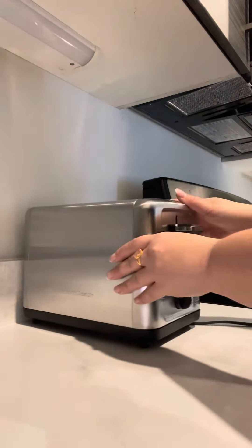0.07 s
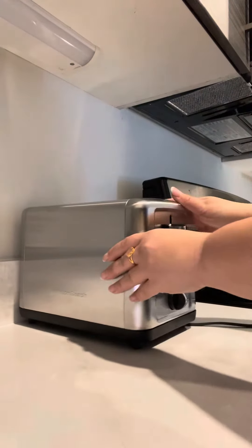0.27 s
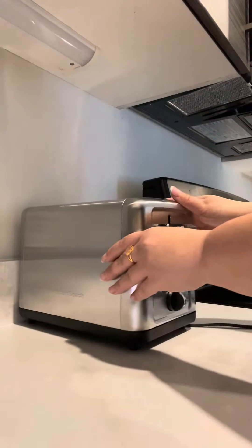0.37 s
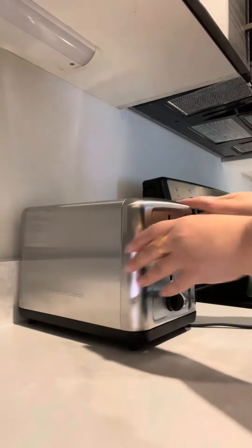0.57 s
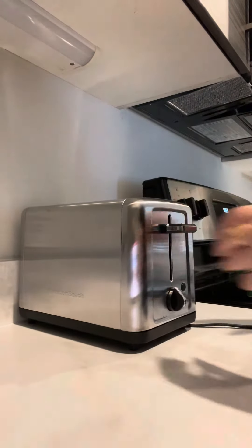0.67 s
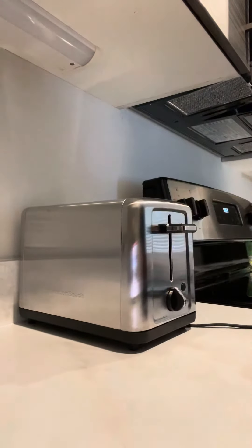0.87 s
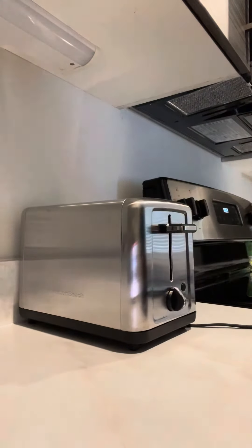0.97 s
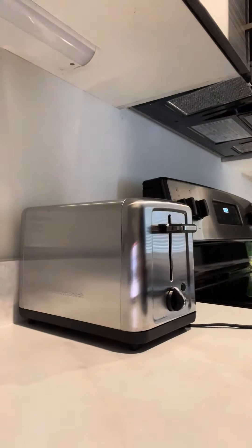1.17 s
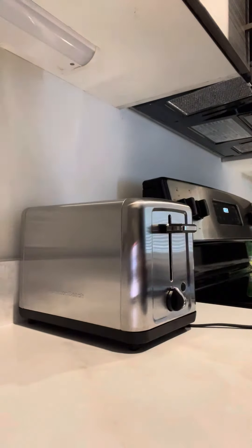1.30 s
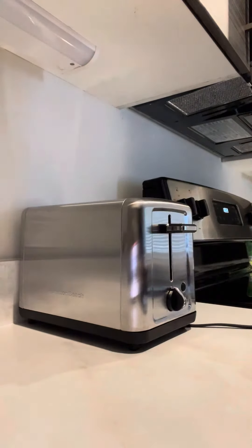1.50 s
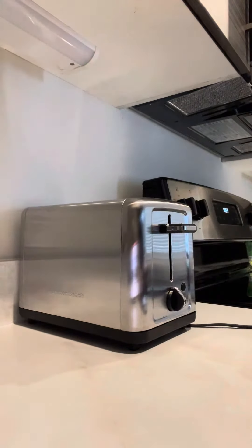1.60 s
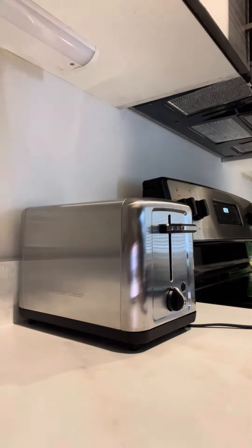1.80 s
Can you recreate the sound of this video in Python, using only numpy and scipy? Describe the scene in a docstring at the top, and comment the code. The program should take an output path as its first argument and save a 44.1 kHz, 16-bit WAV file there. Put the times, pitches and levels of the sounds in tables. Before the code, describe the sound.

A metal toaster slams on a stone counter, heard close in a quiet kitchen. Dull knocks and soft rubbing open at 0-0.05 s; a metallic clack and low thump follow near 0.21 s. At 0.39 s comes the loud double slam, chattering until 0.65 s, with sizzling wires, clinks to 0.83 s and fading steel ring. A faint knock and sharp tick come around 1.65 s, over low hum.

```python
"""Toaster dropped on a counter

A steel toaster is tipped by hand and dropped on a stone kitchen counter, close to a phone: knocks, clacks, a slam.
The slam is noise bursts plus decaying shell and rack modes; dense panel ringing is rippled noise.
Loose wires and springs sizzle as random grains and clink as short noise with chance wire notes.
Small sharp ticks follow (impulse, noise tail, low modes), over room noise, a low hum and a faint hiss."""
import sys
import numpy as np
from scipy import signal
from scipy.fft import rfft, irfft
from scipy.io import wavfile
from scipy.ndimage import uniform_filter1d

SR = 44100
rng = np.random.default_rng(int(sys.argv[2]) if len(sys.argv) > 2 else 0)


def store_pcm(level_fs):
    """Save levels as 16-bit WAV."""
    pcm = np.round(np.clip(level_fs, -1, 1) * 32767).astype(np.int16)
    wavfile.write(sys.argv[1], SR, np.atleast_2d(pcm).T)


N = 81585
TIME_S = np.arange(N) / SR
FREQS_HZ = np.fft.rfftfreq(N, 1 / SR)
MIC_GAP_M, SOUND_M_S = 0.17, 343
# largest phase difference of a mode between the two microphones
SHELL_PHASE_RAD, PART_PHASE_RAD = 1.07, 0.41


def undb(db):
    """Decibels to gain."""
    return 10 ** (np.asarray(db) / 20)


def over_hz(table, hz):
    """Interpolate (frequency, value) points on a log frequency axis."""
    f, v = np.array(table).T
    return np.interp(np.log(np.maximum(hz, 1)), np.log(f), v)


def level_curve(table):
    """Gain over time from (time, level) points."""
    return undb(np.interp(TIME_S, *np.array(table).T))


# left-right correlation, treble centred near 7.5 kHz and wider around it:
# (frequency [Hz], correlation [-1 to 1])
CORRELATION_HZ = [(500, 0.3), (720, -0.066), (2800, 0.28), (4300, -0.42), (7500, 1), (11000, -0.49)]


def colour(pair, spectrum):
    """Shape a mid/side pair to a spectrum and a left-right correlation, high for long waves; rms 1."""
    diffuse = np.sinc(2 * FREQS_HZ * MIC_GAP_M / SOUND_M_S)
    listed = np.clip(over_hz(CORRELATION_HZ, FREQS_HZ), -1, 1)
    correlation = np.where(FREQS_HZ < SOUND_M_S / (4 * MIC_GAP_M), diffuse, listed)
    shape = undb(over_hz(spectrum, FREQS_HZ))
    mid, side = rfft(pair) * shape * np.sqrt([1 + correlation, 1 - correlation])
    stereo = irfft(np.array([mid + side, mid - side]), N)
    return stereo / np.sqrt(np.mean(stereo ** 2))


def noise(spectrum):
    """Coloured stereo noise, rms 1."""
    return colour(rng.standard_normal((2, N)), spectrum)


def grains(spectrum, per_s, spread_db):
    """A swarm of tiny contacts of uneven size, rms 1."""
    hit = rng.random(N) < per_s / SR
    size = undb(spread_db * np.minimum(rng.exponential(size=N), 5))
    return colour(hit * size * rng.standard_normal((2, N)), spectrum)


def decay(start_s, t60_s, attack_s=0.0011):
    """Quick rise, exponential fall."""
    age_s = np.maximum(TIME_S - start_s, 0)
    rise = 1 - np.exp(-age_s / attack_s)
    return rise * np.exp(-np.log(1000) * age_s / t60_s)


def modes(start_s, table, phase_rad=PART_PHASE_RAD):
    """Struck modes, out of step between the sides by chance, as far as the microphone gap allows."""
    out, sides = 0, np.array([[0.5], [-0.5]])
    leads = rng.choice([-1, 1], len(table))
    for (hz, db, t60_s), lead in zip(table, leads):
        phase = lead * min(phase_rad, 2 * np.pi * hz * MIC_GAP_M / SOUND_M_S)
        wave = np.sin(2 * np.pi * hz * (TIME_S - start_s) + sides * phase)
        out = out + undb(db) * decay(start_s, t60_s) * wave
    return out


def wander(span):
    """A smooth random curve of standard deviation 1 that changes over about span points."""
    width = max(int(span), 2)
    curve = uniform_filter1d(uniform_filter1d(rng.standard_normal(N), width), width)
    return curve / curve.std()


# base lands edge after edge, then chatters: (time [s], level [dB])
LANDINGS_S_DB = [(0.3885, -15), (0.3956, -13.5), (0.422, -28), (0.464, -29), (0.4825, -21), (0.503, -24),
                 (0.5185, -29), (0.6497, -40)]
# colour of a landing: (frequency [Hz], relative density [dB per Hz])
SLAM_HZ_DB = [(45, -25), (80, -36), (170, -16), (250, -20), (330, -7), (420, -6), (900, 3.5), (1350, 2.5),
              (1900, -15), (3500, -27), (7000, -20.5), (12000, -36)]
# clear shell modes: (frequency [Hz], level [dB], t60 [s])
SHELL_HZ_DB_S = [(94.65, -32, 1.02), (152.3, -27, 0.32), (180.3, -21.5, 0.26), (216, -25, 0.27),
                 (322.5, -28, 1.23), (343.6, -14.5, 0.14), (486.3, -24, 1.03), (540.5, -29.5, 1.15),
                 (600.5, -36, 1), (624, -15.5, 0.11), (678, -25, 0.064), (812, -20.5, 0.43),
                 (854, -17, 0.27), (926, -33.5, 1.58), (991, -31.5, 1.59), (1095, -21.5, 0.43),
                 (1213, -25.5, 0.37), (1246, -33, 0.11)]
# long notes of the wire racks: (frequency [Hz], level [dB], t60 [s])
RACKS_HZ_DB_S = [(1365, -34.5, 1.6), (1520, -39.5, 1.2), (1717, -37, 0.91), (2137, -46, 0.92),
                 (2580, -56, 0.52), (2920, -39, 1.6), (2990, -47, 0.87), (4000, -34.5, 0.45)]
SLAM_T60_S, SLAM_ATTACK_S = 0.096, 0.00047


def slam():
    """The base hits the counter; the first landing sets shell and racks ringing."""
    blows = 0
    for s, db in LANDINGS_S_DB:
        blows = blows + undb(db) * decay(s, SLAM_T60_S, SLAM_ATTACK_S) * noise(SLAM_HZ_DB)
    return blows + modes(LANDINGS_S_DB[0][0], SHELL_HZ_DB_S + RACKS_HZ_DB_S, SHELL_PHASE_RAD)


# dense ringing of panels and wire racks: (frequency [Hz], relative density [dB per Hz])
RING_HZ_DB = [(30, -17), (80, -4), (130, -3), (230, -14.5), (300, 4.5), (400, -4), (520, 2.5), (650, -3),
              (950, 1), (1450, -3.5), (2050, -11), (2500, -12), (2900, -7), (3700, -14.5), (5000, -19.5),
              (11000, -41.5), (12300, -72)]
# its decay: (frequency [Hz], t60 [s])
RING_HZ_T60_S = [(80, 1.04), (300, 1.23), (1000, 1.616), (3000, 1.744), (9000, 1.44)]
RING_DB, RING_ATTACK_S = -18, 0.0065
RIPPLE_DB, RIPPLE_WIDTH_HZ = 2, 9.9
FLUTTER_DB, FLUTTER_S = 0.9, 0.012


def panel_ring():
    """Dense ringing of thin steel as unevenly rippled noise; each range flutters and decays at its own pace."""
    ripple = undb(RIPPLE_DB * wander(RIPPLE_WIDTH_HZ * N / SR)[:len(FREQS_HZ)])
    field = rfft(noise(RING_HZ_DB)) * ripple / np.sqrt(np.mean(ripple ** 2))
    out = 0
    for hz, t60_s in RING_HZ_T60_S:
        # crossfaded bands that sum to 1
        share = over_hz([(f, float(f == hz)) for f, _ in RING_HZ_T60_S], FREQS_HZ)
        flutter = undb(FLUTTER_DB * wander(FLUTTER_S * SR))
        fade = decay(LANDINGS_S_DB[0][0], t60_s, RING_ATTACK_S)
        out = out + irfft(field * share, N) * flutter * fade
    return undb(RING_DB) * out


CLINK_LOW_HZ, CLINK_HIGH_HZ = 1304, 9550
CLINK_RING_DB, CLINK_RING_T60_S = -8, 0.66


def wire_notes(start_s, count):
    """A chance handful of thin wire notes, different at every call; nominal rms 1 at the start."""
    hz = CLINK_LOW_HZ * (CLINK_HIGH_HZ / CLINK_LOW_HZ) ** rng.random(count)
    db = over_hz(SIZZLE_HZ_DB, hz)
    notes = [(f, d, CLINK_RING_T60_S) for f, d in zip(hz, db)]
    return modes(start_s, notes, SHELL_PHASE_RAD) / np.sqrt(np.sum(undb(db) ** 2) / 2)


# loose racks and springs clink against the shell: (time [s], level [dB])
CLINKS_S_DB = [(0.3985, -26), (0.411, -28), (0.5205, -25), (0.6501, -29), (0.773, -30.5), (0.826, -36.5)]
CLINK_T60_S = 0.076


def clinks():
    """Each clink is a short noise crack, coloured like the sizzle, with its own ringing wire notes."""
    out = 0
    for s, db in CLINKS_S_DB:
        crack = decay(s, CLINK_T60_S) * noise(SIZZLE_HZ_DB)
        out = out + undb(db) * (crack + undb(CLINK_RING_DB) * wire_notes(s, count=14))
    return out


# sizzling treble: (time [s], level [dB])
SIZZLE_S_DB = [(.386, -72), (.392, -24), (.43, -25.5), (.5, -34.5), (.6, -38), (.66, -31.5), (.77, -36),
               (.9, -41.5), (1.1, -58.5), (1.4, -99)]
# its colour, shared by clinks and hiss: (frequency [Hz], relative density [dB per Hz])
SIZZLE_HZ_DB = [(800, -4), (2200, 0), (3000, 7), (4300, -1), (4900, -3), (5800, -2), (7000, -7.5),
                (8500, -12.5), (10800, -9.5), (12000, -27)]


def sizzle():
    """Loose wires and springs chatter inside the shaken body."""
    return level_curve(SIZZLE_S_DB) * grains(SIZZLE_HZ_DB, per_s=4000, spread_db=-1.5)


# loose metal part clacks as the body tilts: (time [s], level [dB])
CLACKS_S_DB = [(0.2129, -25), (0.2189, -29.5)]
# its modes: (frequency [Hz], relative level [dB], t60 [s])
CLACK_HZ_DB_S = [(406, -8, 0.41), (555, -12, 0.2), (2224, -4, 0.15), (2450, -2, 0.13), (2570, -5, 0.093),
                 (2784, -7.5, 0.1), (3170, -9, 0.027)]
# its noise colour: (frequency [Hz], relative density [dB per Hz])
CLACK_NOISE_HZ_DB = [(120, -34), (200, -14.5), (1200, -9), (1700, -21.5), (2600, -10), (3940, -25),
                     (12000, -47.5)]
CLACK_NOISE_DB, CLACK_T60_S = -2.5, 0.12
THUMP_S, THUMP_HZ, THUMP_DB, THUMP_T60_S, THUMP_ATTACK_S = 0.223, 104.6, -18.5, 0.18, 0.0098


def tilt():
    """A metal part clacks over (modes, noise); the weight thumps on a rubber foot (decaying sine)."""
    clacks = 0
    for s, db in CLACKS_S_DB:
        rattle = undb(CLACK_NOISE_DB) * decay(s, CLACK_T60_S) * noise(CLACK_NOISE_HZ_DB)
        clacks = clacks + undb(db) * (modes(s, CLACK_HZ_DB_S) + rattle)
    wave = np.sin(2 * np.pi * THUMP_HZ * (TIME_S - THUMP_S))
    return clacks + undb(THUMP_DB) * decay(THUMP_S, THUMP_T60_S, THUMP_ATTACK_S) * wave


# dull knocks: (time [s], level [dB], pitch ratio, hollow-mode weight [dB])
KNOCKS_S_DB = [(.001, -33.5, 0.94, -5), (0.0122, -25, 1.02, 1.5), (0.0504, -28, 0.98, -16),
               (1.647, -36.5, 1.23, -1)]
# their noise colour: (frequency [Hz], relative density [dB per Hz])
KNOCK_HZ_DB = [(100, 17), (250, -27), (380, 3), (560, -22), (850, 10.5), (1300, -44), (2000, -3),
               (2750, -7), (4200, -21), (11000, -34)]
# their modes before the pitch ratio: (frequency [Hz], relative level [dB], t60 [s])
KNOCK_TAP_HZ_DB_S = [(863, -0.5, 0.04), (923, -5, 0.028)]
# their hollow low modes before ratio and weight: (frequency [Hz], relative level [dB], t60 [s])
KNOCK_HOLLOW_HZ_DB_S = [(357, -6, 0.11), (400, -5, 0.084)]
KNOCK_NOISE_DB, KNOCK_T60_S = -7.5, 0.1


def knocks():
    """Dull little knocks: tap and hollow modes scaled in pitch, plus a noise burst."""
    out = 0
    for s, db, pitch, hollow_db in KNOCKS_S_DB:
        tap = modes(s, [(hz * pitch, *rest) for hz, *rest in KNOCK_TAP_HZ_DB_S])
        hollow = modes(s, [(hz * pitch, *rest) for hz, *rest in KNOCK_HOLLOW_HZ_DB_S])
        burst = undb(KNOCK_NOISE_DB) * decay(s, KNOCK_T60_S) * noise(KNOCK_HZ_DB)
        out = out + undb(db) * (tap + undb(hollow_db) * hollow + burst)
    return out


# sharp ticks: (time [s], level [dB])
TICKS_S_DB = [(1.6671, -28.5), (1.709, -45.5)]
# their colour: (frequency [Hz], relative density [dB per Hz])
TICK_HZ_DB = [(100, -9), (430, 6), (640, -14), (950, 9), (1450, -14), (1800, 4.5), (2150, -9), (2850, 7),
              (4300, -4), (5200, -2), (7000, -8.5), (13000, -13)]
# body that a tick shakes: (frequency [Hz], relative level [dB], t60 [s])
TICK_BODY_HZ_DB_S = [(116.6, -16, 0.3), (425, -8, 0.076), (1044, -12, 0.019)]
TICK_SNAP_DB, TICK_T60_S = 10, 0.013
TICK_TAIL_DB, TICK_TAIL_T60_S = -12.5, 0.095


def ticks():
    """Each tick is a sharp snap with a low body and a short tail from the counter and cupboards."""
    out = 0
    for s, db in TICKS_S_DB:
        impulse = signal.unit_impulse(N, int(s * SR))
        snap = colour(np.array([impulse, np.zeros(N)]), TICK_HZ_DB)
        fade = decay(s, TICK_T60_S) + undb(TICK_TAIL_DB) * decay(s, TICK_TAIL_T60_S)
        tail = fade * noise(TICK_HZ_DB)
        body = modes(s, TICK_BODY_HZ_DB_S)
        out = out + undb(db) * (undb(TICK_SNAP_DB) * snap / snap.max() + tail + body)
    return out


# brief light scuffs: (time [s], half-length [s], level [dB])
SCUFFS_S_S_DB = [(0.054, 0.0052, -41.5), (1.84, 0.017, -47.5)]
# their colour: (frequency [Hz], relative density [dB per Hz])
SCUFF_HZ_DB = [(300, -9), (1000, -12), (1800, -9), (2900, 5.5), (4500, -8.5), (11000, -31)]


def scuffs():
    """Light scuffs: noise under bell-shaped swells."""
    swells = sum(undb(db) * np.exp(-((TIME_S - s) / half_s) ** 2) for s, half_s, db in SCUFFS_S_S_DB)
    return swells * noise(SCUFF_HZ_DB)


# soft rubbing and rustling: (time [s], level [dB])
RUSTLE_S_DB = [(0, -37), (.06, -43), (.1, -45), (.19, -47), (.25, -37), (.31, -49), (.38, -45), (.6, -90),
               (1.55, -60), (1.69, -50.5), (1.84, -57.5)]
# its colour: (frequency [Hz], relative density [dB per Hz])
RUSTLE_HZ_DB = [(150, 2.5), (400, 3), (600, -5), (900, -1), (1600, -10.5), (2800, -5.5), (4200, -22),
                (6500, -30), (11000, -36)]


def rustle():
    """Soft rubbing as a swarm of small contacts."""
    return level_curve(RUSTLE_S_DB) * grains(RUSTLE_HZ_DB, per_s=3300, spread_db=-0.5)


# room noise: (frequency [Hz], relative density [dB per Hz])
ROOM_HZ_DB = [(24, -20), (45, 1.5), (110, 1), (160, -1), (220, -14.5), (380, -8), (600, -16.5),
              (950, -13.5), (1800, -58), (2800, -37), (4500, -47), (11000, -85)]
# faint high hiss: (time [s], level [dB])
HISS_S_DB = [(0, -54), (.18, -70), (.3, -55.5), (1.5, -85), (1.68, -52.5), (1.8, -61)]
ROOM_DB, HUM_HZ, HUM_DB = -49, 165, -55.5


def kitchen():
    """Low room noise, an appliance's hum (sine) and a faint hiss coloured like the sizzle."""
    room = undb(ROOM_DB) * noise(ROOM_HZ_DB)
    hum = undb(HUM_DB) * np.sin(2 * np.pi * HUM_HZ * TIME_S)
    hiss = level_curve(HISS_S_DB) * noise(SIZZLE_HZ_DB)
    return room + hum + hiss


def scene():
    """Everything at the two microphones."""
    drop = slam() + panel_ring() + clinks() + sizzle()
    handling = tilt() + knocks() + scuffs() + rustle()
    return drop + handling + ticks() + kitchen()


CEILING, RUMBLE_HZ, TOP_HZ = 1.1, 35.4, 12645


def record(dry):
    """The phone rounds the loudest peaks and cuts the deepest rumble and the top."""
    rounded = CEILING * np.tanh(dry / CEILING)
    low_cut = signal.butter(2, RUMBLE_HZ, "high", fs=SR, output="sos")
    # 0.2 dB passband ripple, 70 dB stopband
    top_cut = signal.ellip(8, 0.2, 70, TOP_HZ, fs=SR, output="sos")
    return signal.sosfilt(top_cut, signal.sosfilt(low_cut, rounded))


dry = scene()
out = record(dry)
store_pcm(out)
```